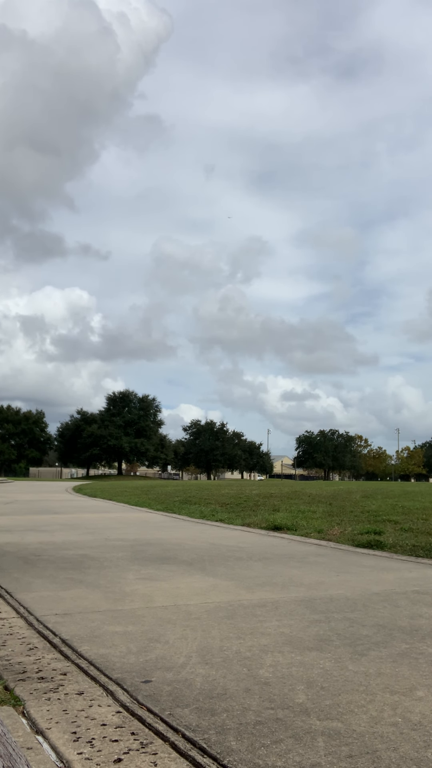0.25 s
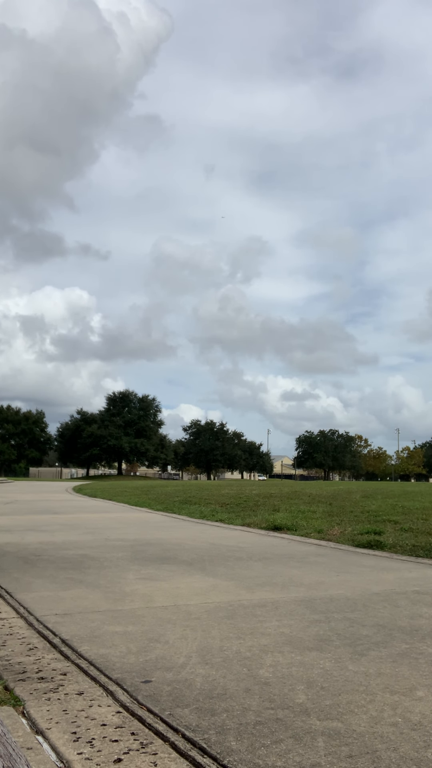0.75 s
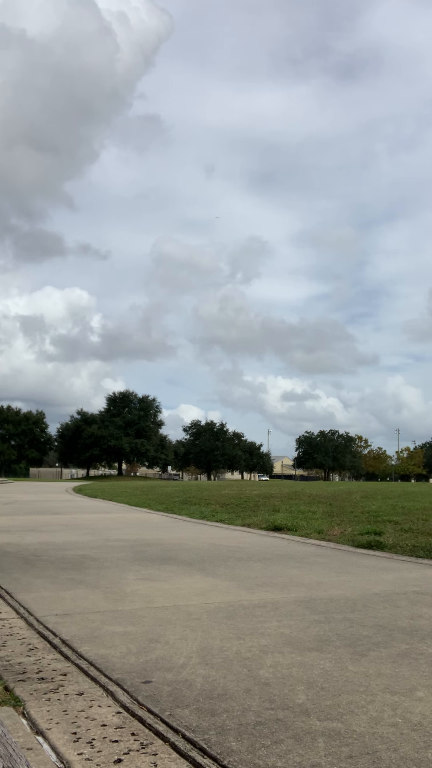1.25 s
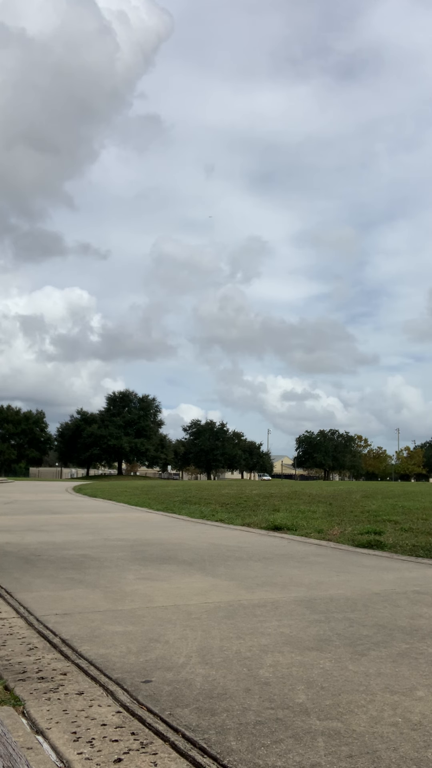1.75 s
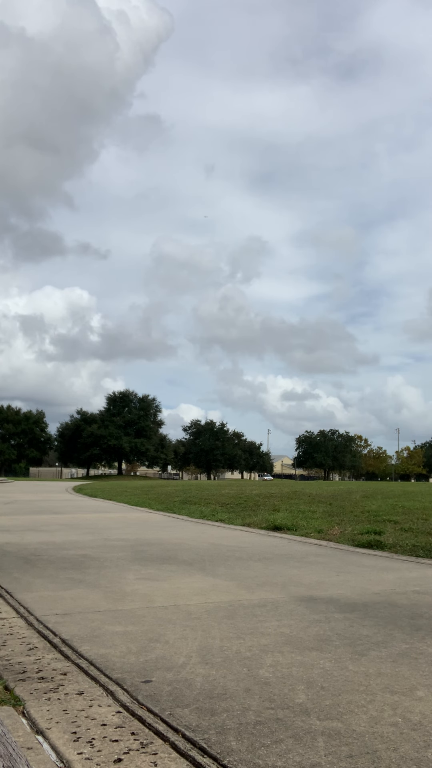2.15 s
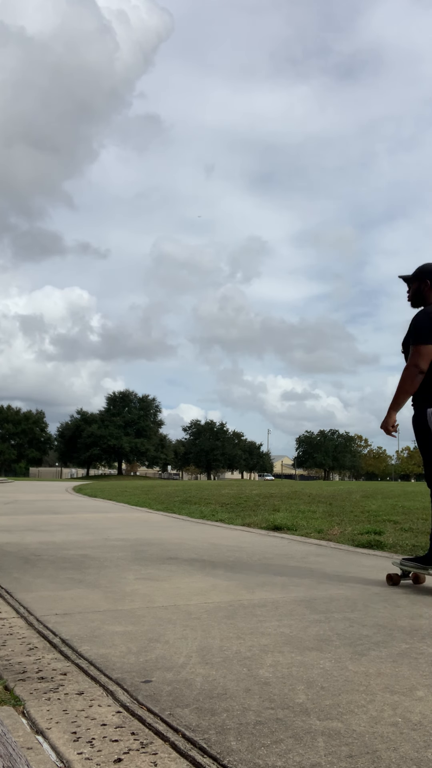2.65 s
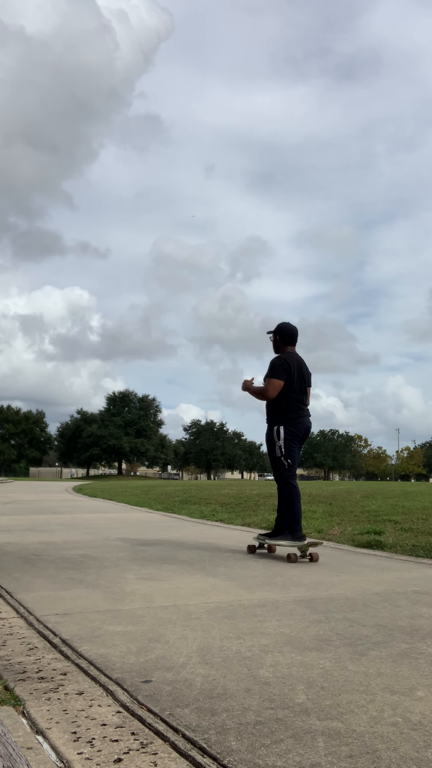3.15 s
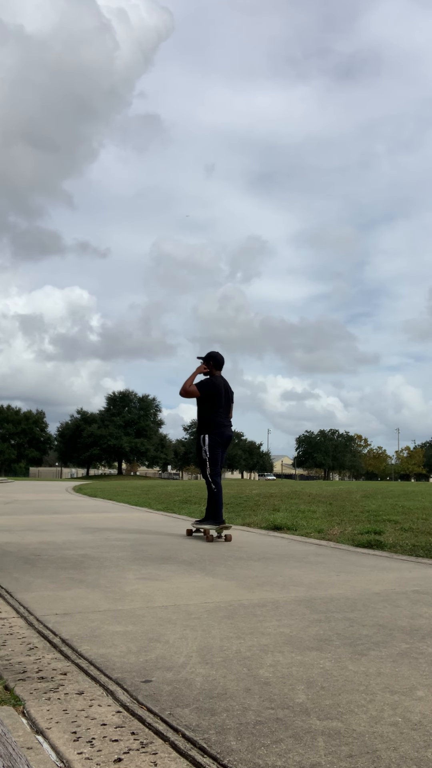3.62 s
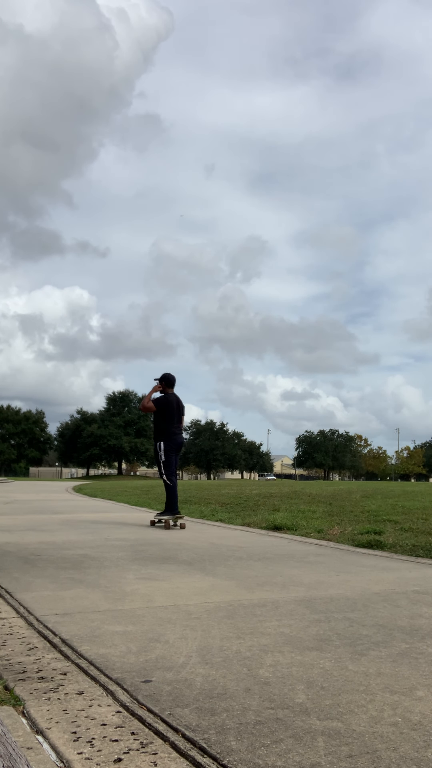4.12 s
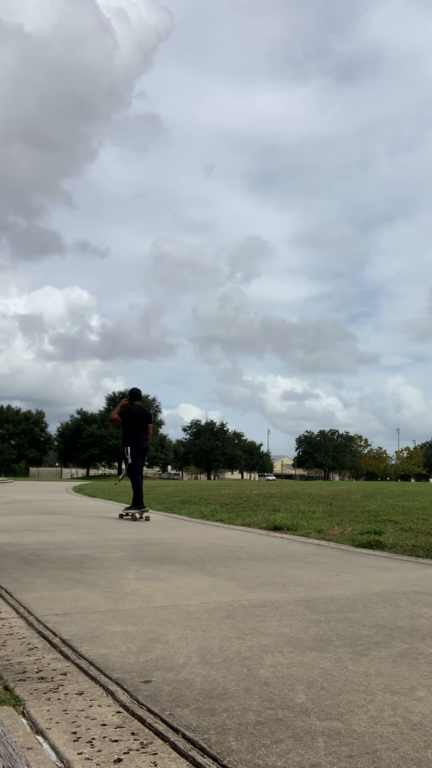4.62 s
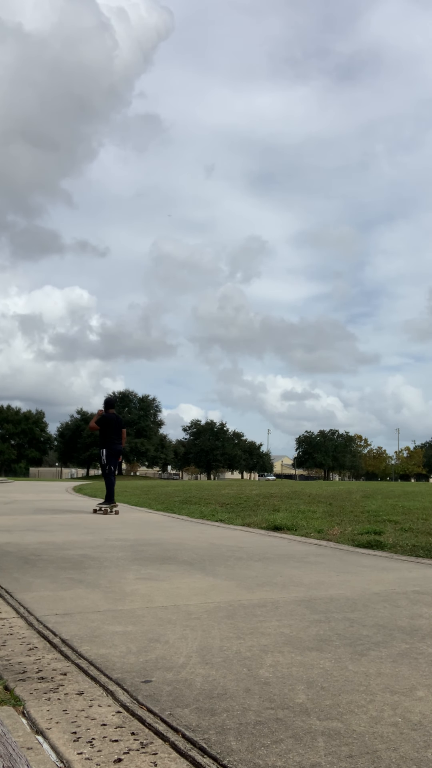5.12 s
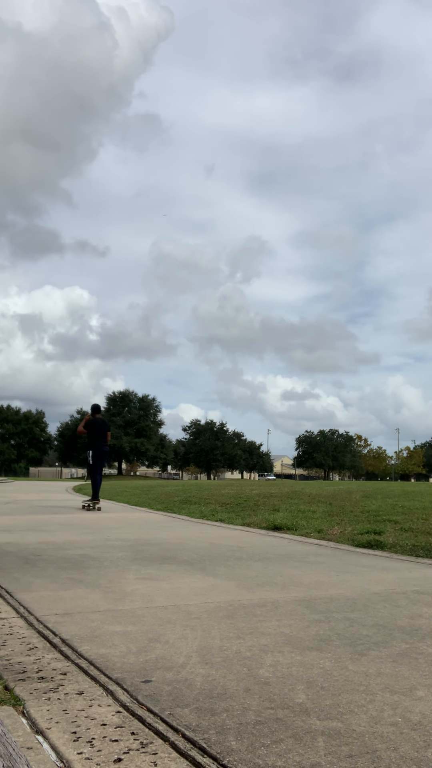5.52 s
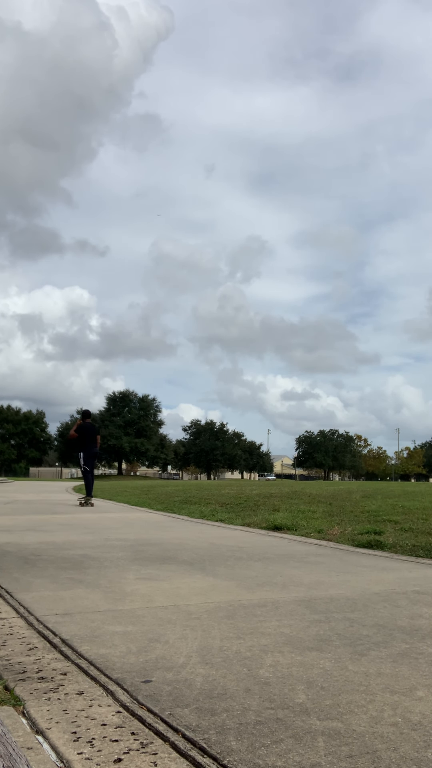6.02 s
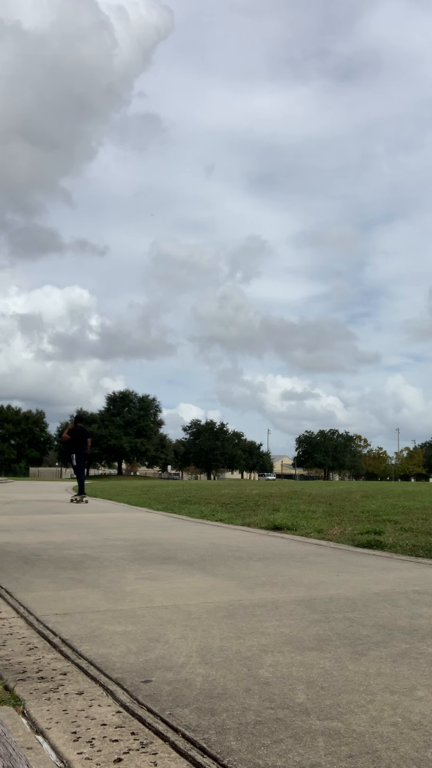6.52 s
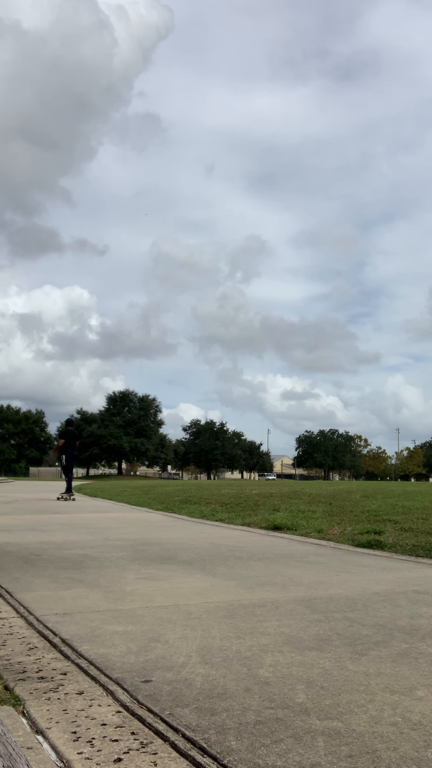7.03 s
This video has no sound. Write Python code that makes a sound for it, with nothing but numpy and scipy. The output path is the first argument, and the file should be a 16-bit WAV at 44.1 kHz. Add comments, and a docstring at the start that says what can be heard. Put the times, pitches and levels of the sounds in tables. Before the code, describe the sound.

Gritty skateboard wheels approach, pass close by and fade along a park path, with wooden seam clacks, loose metal buzz and low wind buffeting.

```python
"""Skateboard passing on concrete

A skateboard coasts past a stereo microphone about three metres off a park path, then rolls away, slowing.
Concrete that differs from slab to slab drives shaped noises: deck roar, wheel rasp and grit, pulsed by
the wheel turns. Seams and sand ring decaying wood and metal modes; a loose truck buzzes in step.
Noise bursts make shoe scuffs; low noise and slaps are wind on the microphone, over a faint steady hiss."""
import sys
import numpy as np
from scipy import signal
from scipy.fft import rfft, irfft
from scipy.io import wavfile
from scipy.ndimage import uniform_filter1d

SR = 44100
rng = np.random.default_rng(int(sys.argv[2]) if len(sys.argv) > 2 else 0)


def master_out(mix):
    """Clip the mix to full scale and print it as 16-bit PCM to the path in sys.argv[1]."""
    frames = np.transpose(np.atleast_2d(mix))
    ceiling = np.clip(frames, -1, 1)
    pcm = np.round(ceiling * 32767).astype(np.int16)
    wavfile.write(sys.argv[1], SR, pcm)


N = 320944  # length in samples

# Speed of the wheels. Each row: time in seconds, turns per second.
WHEEL_SPIN = [(0.0, 15.13), (0.5, 17.19), (1.5, 17.95), (3.0, 16.43), (3.5, 15.54), (7.28, 11.05)]
# Deck roar, wheel rasp, grit. Each row: level at the nearest point in dB before the slab's own finish,
# loss per doubling of distance in dB.
ROLL_LEVELS = [(-44, 4), (-49, 4.5), (-53.5, 5)]
# Finish of each stretch of concrete. Each row: mid-crossing in seconds, deck roar, wheel rasp, grit in dB.
SLAB_FINISH = [(0.07, -7.5, 7.5, 3), (.48, -2, 4, -2), (.77, 7, 10.5, 3.5), (.9, 6, 3.5, -1.5),
               (1.2, 9.5, 7, -2), (1.72, 6, -1, 1), (2.35, 3, 2.5, 1), (2.95, -0.5, -1, -1),
               (3.9, 1.5, 5, -1.5), (4.56, -3.5, 1.5, -5), (4.82, -2.5, 1, 3), (5.25, -6, -3, -2.5)]
# Small coarse patches under a wheel. Each row: middle in seconds, extra rasp in dB, half length in seconds.
COARSE_PATCHES = [(.15, 5.5, .035), (0.247, 2.5, .04), (0.81, 2.5, 0.054), (1.252, 5.5, .028),
                  (1.41, 4.5, .025), (1.56, 3, .06), (2.56, 3, .03), (3.96, 2.5, 0.022)]
# Colour of the rolling in five views of the board, far to leaving.
# Each row: frequency in Hz, relative density in dB per Hz.
FAR_COLOUR = [(170, -4.5), (346, -6), (740, -19), (1167, -9.5), (1430, -13.5), (1938, -4.5), (2908, -12.5),
              (3747, -16), (3942, -17), (5344, -25.5), (6546, -34.5), (7245, -44.5), (10869, -46),
              (15500, -68)]
ONCOMING_COLOUR = [(170, 1), (300, -4.5), (470, -17.5), (590, -9), (850, -24.5), (1080, -20), (1500, -22.5),
                   (1900, -27), (2600, -29), (3400, -30.5), (5000, -34), (7000, -36), (9000, -34.5),
                   (12500, -39), (15500, -29)]
ABREAST_COLOUR = [(170, 1.5), (210, -2.5), (300, -14), (490, -16.5), (615, -5), (790, -13), (930, -22.5),
                  (1100, -27.5), (1280, -27), (1430, -18.5), (2200, -24.5), (2600, -15), (3200, -28),
                  (4100, -23.5), (4600, -18.5), (6500, -28), (9000, -28.5), (12500, -37), (15500, -41)]
PAST_COLOUR = [(170, 7.5), (250, -34), (340, -12), (450, -9.5), (600, -7.5), (780, -14.5), (1020, -16.5),
               (1250, -27), (2200, -23.5), (3100, -32.5), (4600, -29.5), (7000, -43), (10000, -40),
               (12500, -43), (15500, -50)]
LEAVING_COLOUR = [(170, 1), (320, -10.5), (460, 4.5), (620, 0.5), (730, -20.5), (880, -23.5), (1020, -9.5),
                  (1800, -22.5), (2030, -11), (2550, -11.5), (3100, -31), (4700, -24), (7000, -36),
                  (11000, -39.5), (15500, -46)]
# When each of the five views holds, in that order. Each entry: time in seconds.
VIEW_TIMES = [.7, 1.4, 2.45, 3.4, 4.15]
# The two microphone ports. Each row: frequency in Hz, phase between the ports in radians with the board
# oncoming, abreast, ahead, then likeness of the ports from 0 to 1.
MIC_PORTS = [(100, 0, 0, 0, 1), (300, 0, -.8, 0, .92), (450, -.6, -.1, -.3, .87), (560, -1.7, 1, -.4, .92),
             (700, -2.4, 3.3, -.7, .85), (880, -3, 4.2, -.3, .88), (1100, -.8, 4.4, -.2, .8),
             (1400, -1.6, 4.3, 0, .8), (1900, -1.7, 4.2, -.4, .75), (2500, -2.6, 3.3, -4.5, .75),
             (3000, -2.8, 2, -4.8, .65), (3500, -2.4, -1, -5.7, .75), (4000, -2.4, -1.3, -6.4, .75),
             (4600, -2.9, -2.5, -3.9, .8), (5700, -4, -3.7, -4.3, .7), (6300, -5.9, -6.2, -6, .65),
             (7200, -6.8, -6.8, -6.8, .85), (11800, -8.7, -8.7, -8.7, .8),
             (12900, -9.42, -9.42, -9.42, .98)]
# Where the sound comes from. Each row: time in seconds, share oncoming, abreast, ahead from 0 to 1.
BEARING_SHARES = [(1.74, 1, 0, 0), (1.9, 0, 1, 0), (3.1, 0, 1, 0), (3.95, 0, 0, 1)]
# Steady, diffuse background hiss, from the recorder and the surroundings.
# Each row: frequency in Hz, relative density in dB per Hz.
BACKGROUND_COLOUR = [(383, -4.5), (574, -11), (800, -7.5), (1055, -6.5), (1843, -5.5), (2908, -16.5),
                     (4363, -21.5), (4829, -22), (9821, -30.5), (15500, -32)]
# Strength of the breeze at the microphone. Each row: time in seconds, level in dB before its lumps.
BREEZE = [(0, -38), (.2, -27.5), (.7, -39), (1.1, -32), (1.45, -25), (1.62, -36), (2.0, -33), (2.5, -34),
          (2.8, -35), (3.05, -37), (3.4, -36), (4.0, -35), (4.3, -38), (4.75, -34.5), (5.15, -33.5),
          (5.5, -31.5), (6.25, -32), (6.7, -40), (7.28, -37.5)]
# Short gusts on top of the breeze. Each row: peak in seconds, level in dB, half length in seconds.
SHORT_GUSTS = [(.49, -27.5, 0.018), (3.3, -27, 0.045), (3.67, -27.5, 0.031), (3.79, -29.5, 0.027),
               (4.125, -22.5, 0.0099), (4.62, -30, 0.047), (4.77, -27.5, 0.08), (5.49, -34, 0.052),
               (5.72, -28.5, 0.043), (6.6, -30, 0.031), (6.83, -29, 0.023)]
# Colour of the wind rumble. Each row: frequency in Hz, relative density in dB per Hz.
RUMBLE_COLOUR = [(12, -62), (20, 7.5), (48, 3.5), (69, 12), (113, -4.5), (199, -19), (330, -30), (430, -36),
                 (730, -120)]
# Eddies slapping the microphone. Each row: start in seconds, relative level in dB, fall time in seconds.
EDDY_SLAPS = [(.066, -39.5, 0.015), (.146, -28.5, 0.012), (3.77, -31.5, 0.0034), (4.561, -44, 0.013),
              (4.62, -37, 0.033), (5.70, -46, 0.013), (5.758, -53, 0.0073), (5.906, -40, 0.013),
              (6.466, -37.5, 0.0088), (6.572, -49, 0.012), (6.81, -45, .015)]
# Colour of those slaps. Each row: frequency in Hz, relative density in dB per Hz.
SLAP_COLOUR = [(30, -5), (120, 11), (300, 5), (600, -17), (1200, -26), (4000, -28), (16000, -103)]
# Gusts that swing the diaphragm. Each row: start in seconds, relative level in dB, frequency in Hz,
# fall time in seconds.
WIND_THUMPS = [(0.163, -6.5, 69, 0.016), (1.936, -20, 58.5, .05), (4.517, -17, 42.2, .03),
               (4.565, -16, 52.4, 0.061), (6.806, -28, 60, .025)]
# A shoe brushing the ground. Each row: start in seconds, relative level in dB, fall time in seconds.
SHOE_SCUFFS = [(.535, -45.5, 0.06), (.573, -38.5, 0.0071), (.745, -44, 0.022)]
# Colour of the sole. Each row: frequency in Hz, relative density in dB per Hz.
SOLE_COLOUR = [(200, -42), (600, 14.5), (1200, 11.5), (2200, 2), (5000, -14), (16000, -38)]
# Large sand grains crushed by a wheel. Each row: start in seconds, relative level in dB.
SAND_GRAINS = [(0.8352, -41), (1.574, -54), (1.629, -53), (2.392, -31), (2.574, -31), (3.961, -32),
               (4.125, -40), (4.368, -38.5), (4.81, -38), (5.035, -36)]
# Wheels striking the edge of a seam or crack, clustered as each axle crosses. Each row: start in seconds,
# knock in relative dB, pitch factor, hardness in dB per octave, low thud in dB, ring time factor,
# crack in relative dB, truck ring in relative dB.
SEAM_HITS = [(1.7202, -20.8, .88, 4.2, -1, 1, -32, -39), (1.7236, -22.5, .9, 4.3, 7, 1, -33, -34),
             (1.7306, -20.5, .85, 2.2, 6, .8, -36, -45), (1.893, -26.6, .99, 3.5, -1, 1.3, -40, -53),
             (1.9004, -21.8, .91, 4.5, 0, .95, -34, -46), (1.906, -16.4, .89, 1.7, -4, 1, -35, -44),
             (1.9168, -33.5, .94, 2.2, 0, .8, -40, -58), (2.7143, -33.5, .96, 1, 3, 1, -42, -43),
             (2.7171, -33.7, .91, 2.5, 4, .8, -44, -43), (2.8909, -30.5, .92, 4.5, 3, .9, -42, -57),
             (2.8961, -31.5, .93, 4.5, 2, 1.2, -44, -54), (4.561, -30, .92, 3, 0, .8, -55, -62),
             (4.937, -26.6, .99, 4.5, -10, 1.1, -39, -38), (4.9393, -27.4, .97, .5, -10, 1.06, -40, -33),
             (4.9484, -31.5, .99, 2.3, -9, 1.3, -47, -44), (5.1576, -21, 1.02, 0.3, -5, 1.75, -35, -30),
             (5.1657, -23.6, 1.02, 2.6, 4, .64, -38, -35), (5.1739, -34, .93, .3, 2, 1, -49, -48)]
# Wooden deck modes. Each row: frequency in Hz before the pitch factor, relative level in dB,
# t60 in seconds before the ring time factor.
DECK_MODES = [(244, 2.5, 0.073), (363, -3.5, 0.076), (517, 10.7, 0.025), (656, 0.8, 0.042),
              (754, -4.0, 0.04), (907, -6.8, 0.042), (1077, -11.4, 0.034), (1322, -11.3, 0.03),
              (1547, -13.1, 0.043), (2088, -18.3, 0.04)]
# Modes of a struck truck. Each row: frequency in Hz, relative level in dB, t60 in seconds.
METAL_MODES = [(1592, 1.5, .04), (2547, -2.5, .025), (2941, -3, .022), (3673, 0, .027), (4100, -5, .018)]
# Colour of the gritty crack. Each row: frequency in Hz, relative density in dB per Hz.
CRACK_COLOUR = [(150, -14), (350, 4), (750, 5), (1100, 0), (1650, 1), (2100, -8), (3700, -8), (4800, -14),
                (6400, -5), (8000, -6), (11000, -8), (16000, -12)]
# Truck resonances under buzz and rattle. Each row: frequency in Hz, width in Hz, relative level in dB.
TRUCK_RESONANCES = [(1620, 240, 1), (2550, 550, 0), (3680, 600, 0)]
# Bouts of buzzing from a loose truck. Each row: peak in seconds, level in dB, half length in seconds.
BUZZ_BOUTS = [(4.28, -61, .2), (4.76, -57, .14), (4.915, -51.5, .045), (5.05, -51, .04)]

WHEEL_M = .22  # metres rolled in one turn of a wheel
PASS_S, CLOSEST_M = 2.645, 2.92  # when the board is nearest (s), and how near (m)
CROSSING_S = 0.12  # time the board takes to settle on a new finish
TAPS_PER_TURN = 5  # taps of the loose part in one turn of a wheel, on average
BACKGROUND_DB = -53.5
EDGE_HZ = 15900  # upper band limit
FFT_SIZE, HOP = 1024, 256  # samples

TIME = np.arange(N) / SR
HZ = np.fft.rfftfreq(FFT_SIZE, 1 / SR)
FRAMES = np.arange(-(-N // HOP) + 1) * HOP / SR  # spectrum frame times (s)


def amp(db):
    """Decibels to gain."""
    return 10 ** (np.asarray(db) / 20)


def unit(x):
    """Scales to rms 1."""
    return x / np.sqrt(np.mean(x ** 2) + 1e-20)


def colour(points):
    """A short spectrum as dB on every frequency bin, straight between points on a log axis."""
    hz, db = np.transpose(points)
    return np.interp(np.log(HZ + 1), np.log(hz + 1), db)


def curve(rows, t, axis=1):
    """One column of a table of curves at the times (or frequencies) t."""
    rows = np.array(rows)
    return np.interp(t, rows[:, 0], rows[:, axis])


def below(hz, order=6):
    """Gain of a low-pass, steep by default."""
    return 1 / np.sqrt(1 + (HZ / hz) ** (2 * order))


def above(hz):
    return np.sqrt(1 - below(hz) ** 2)


def wander(per_s):
    """Smooth chance of rms 1 that changes up to about per_s times a second."""
    hz = np.fft.rfftfreq(N, 1 / SR)
    spectrum = rfft(rng.standard_normal(N))
    return unit(irfft(spectrum / (1 + (hz / per_s) ** 4), N))


def burst(s, rise, fall):
    """An envelope that starts at s, swells and dies away."""
    t = np.maximum(TIME - s, 0)
    return (1 - np.exp(-t / rise)) * np.exp(-np.minimum(t / fall, 60))


def bell(s, half):
    """A bell-shaped rise and fall with its peak of 1 at s."""
    return np.exp(-np.minimum(((TIME - s) / half) ** 2, 60))


def swells(rows):
    """Bell-shaped rises and falls of gain, summed."""
    return sum(amp(db) * bell(s, half) for s, db, half in rows)


def white():
    """Two unrelated noises."""
    return rng.standard_normal((2, N))


def heard(pair, gain, diffuse=False):
    """Colours two unrelated signals and folds them into the two ports; diffuse sound averages the bearings."""
    a, b = signal.stft(pair, nperseg=FFT_SIZE, noverlap=FFT_SIZE - HOP)[2].transpose(0, 2, 1)
    turns = np.array([np.exp(1j * curve(MIC_PORTS, HZ, axis=k)) for k in (1, 2, 3)])
    shares = np.transpose([curve(BEARING_SHARES, FRAMES, axis=k) for k in (1, 2, 3)])
    direction = turns.mean(0) if diffuse else shares @ turns
    same = curve(MIC_PORTS, HZ, axis=4) * direction
    unlike = np.sqrt(np.maximum(1 - abs(same) ** 2, 0))
    ports = np.array([a, same.conj() * a + unlike * b]) * gain
    return signal.istft(ports.transpose(0, 2, 1), nperseg=FFT_SIZE, noverlap=FFT_SIZE - HOP)[1][:, :N]


def distance():
    """Metres to the board, which follows a straight line as far as its wheels have turned."""
    along = WHEEL_M * np.cumsum(curve(WHEEL_SPIN, TIME)) / SR
    return np.hypot(CLOSEST_M, along - np.interp(PASS_S, TIME, along))


def roll_gains():
    """Roar, rasp and grit fade with distance and follow the finish of the concrete under the wheels."""
    doublings = np.log2(distance() / CLOSEST_M)
    slabs = np.array(SLAB_FINISH)
    reached = np.clip((TIME - slabs[:, :1]) / CROSSING_S + .5, 0, 1)
    steps_db = np.diff(slabs[:, 1:], axis=0, prepend=0)
    finish_db = steps_db.T @ reached
    finish_db[1] += sum(db * bell(s, half) for s, db, half in COARSE_PATCHES)
    return [amp(db - loss_db * doublings + finish)
            for (db, loss_db), finish in zip(ROLL_LEVELS, finish_db)]


def tread(depth_db, second_db, uneven_db):
    """A rough patch on each of two wheels meets the ground once a turn; the wheels drift out of step."""
    turns = np.cumsum(curve(WHEEL_SPIN, TIME)) / SR + .03
    other_turns = turns + (TIME - 2.9) / 2.4
    patch = np.exp(1.6 * (np.cos(2 * np.pi * turns) - 1))
    other = np.exp(7 * (np.cos(2 * np.pi * other_turns) - 1))  # a shorter patch
    load = .5 + .09 * wander(6.6)
    return unit(amp((depth_db * patch + second_db * other) * load + uneven_db * wander(58)))


def stones(per_s, spread_db, share):
    """Tiny blows from the grains of the concrete: separate clicks over a dense hiss."""
    size = amp(spread_db * np.minimum(rng.exponential(1, N), 4))
    clicks = size * (rng.random(N) < per_s / SR)
    share = np.clip(share, 0, 1)  # power share of the clicks
    return np.sqrt(share) * unit(clicks * white()) + np.sqrt(1 - share) * white()


def ripple(depth_db):
    """Random narrow ripple in the rolling colour, drifting slowly and shallower in the treble."""
    field = rng.standard_normal((len(FRAMES), len(HZ)))
    slow = uniform_filter1d(field, size=30, axis=0)
    drift = unit(uniform_filter1d(slow, size=2, axis=1))
    return amp(depth_db * drift * below(7000, order=1))


def rolling():
    """Deck roar, wheel rasp and grit share one colour, which changes as the board goes by."""
    colours = FAR_COLOUR, ONCOMING_COLOUR, ABREAST_COLOUR, PAST_COLOUR, LEAVING_COLOUR
    views = [colour(view) for view in colours]
    weights = np.transpose([np.interp(FRAMES, VIEW_TIMES, row) for row in np.eye(len(views))])
    tone = amp(weights @ views) * above(158) * ripple(depth_db=4.0)
    bands = above(273) * below(1170), above(696) * below(5800), above(6010) * below(EDGE_HZ)
    # each layer's colour is levelled within its own band, frame by frame
    roar, rasp, grit = (tone / np.sqrt(np.mean((tone * band) ** 2, 1, keepdims=True)) for band in bands)
    roar_gain, rasp_gain, grit_gain = roll_gains()
    coarse = stones(per_s=1200, spread_db=2.8, share=.7)
    fine = stones(per_s=3000, spread_db=2.7, share=.65)
    roar_tread = tread(depth_db=-1.5, second_db=0.0, uneven_db=0.7)
    rasp_tread = tread(depth_db=4.5, second_db=1.0, uneven_db=2.0)
    grit_tread = tread(depth_db=11, second_db=0, uneven_db=1.1)
    out = heard(white() * roar_gain * roar_tread, roar * below(1135))
    out += heard(coarse * rasp_gain * rasp_tread, rasp * bands[1])
    out += heard(fine * grit_gain * grit_tread, grit * bands[2])
    return out


def background():
    """Steady, diffuse background hiss, from the recorder and the surroundings, that barely swells."""
    tone = unit(amp(colour(BACKGROUND_COLOUR)) * below(EDGE_HZ))
    return amp(BACKGROUND_DB + .5 * wander(4.5)) * heard(white(), tone, diffuse=True)


def wind(steady=0.93, flutter_db=2.5, upper_db=5.5, lumps_db=2.5, lumps_per_s=9):
    """Turbulence at the microphone: a lumpy rumble swelling in gusts; its upper part comes in flurries."""
    tone = unit(amp(colour(RUMBLE_COLOUR)) * below(520, order=4))
    deep = heard(white(), tone * below(178))
    swell = np.sqrt(uniform_filter1d(deep[0] ** 2, size=3000) + 1e-9)
    deep = unit(deep / swell ** np.clip(steady, 0, 1))  # the gust, not chance, sets the slow swell
    upper = heard(white(), tone * above(142.0)) * unit(amp(flutter_db * wander(61)))
    breeze = amp(curve(BREEZE, TIME) + lumps_db * wander(lumps_per_s))
    return np.hypot(breeze, swells(SHORT_GUSTS)) * (deep + amp(upper_db) * upper)


def puffs(rows, spectrum):
    """Short bursts of noise of one colour: air slapping the microphone, or a sole rubbing the ground."""
    envelope = sum(amp(db) * burst(s, rise=fall / 10, fall=fall) for s, db, fall in rows)
    return 2 * envelope * heard(white(), unit(amp(colour(spectrum))))


def eddies():
    """Eddies slap the microphone in short puffs."""
    return puffs(EDDY_SLAPS, SLAP_COLOUR)


def thumps():
    """Deep pressure blows of the wind: the pushed diaphragm swings as a decaying sine."""
    return sum(amp(db) * burst(s, rise=0.0067, fall=fall) * np.sin(2 * np.pi * hz * (TIME - s))
               for s, db, hz, fall in WIND_THUMPS)


def scuffs():
    """A shoe brushes the ground: short rubs of noise."""
    return puffs(SHOE_SCUFFS, SOLE_COLOUR)


def ring(s, modes, rise=0.0007):
    """One blow sets modes ringing; neighbours swing in opposite directions."""
    out, start = np.zeros(N), round(s * SR)
    t = np.arange(SR // 5) / SR
    tones = sum((-1) ** k * amp(db - 60 * t / t60) * np.sin(2 * np.pi * hz * t)
                for k, (hz, db, t60) in enumerate(modes))
    out[start:start + len(t)] = tones * (1 - np.exp(-t / rise))
    return out


def knock(s, pitch, hardness_db=0, thud_db=0, ring_time=1):
    """Hard blows brighten the deck, heavy ones bend its low modes; the rider's weight sets the ring time."""
    modes = []
    for hz, db, t60 in DECK_MODES:
        tilt_db = hardness_db * np.log2(hz / 500) + thud_db * (hz < 400)
        modes.append((hz * pitch, db + tilt_db, t60 * ring_time))
    return ring(s, modes)


def truck():
    """Gain of the truck's metal resonances."""
    return unit(sum(amp(db) / (1 + (2 * (HZ - hz) / width) ** 2) for hz, width, db in TRUCK_RESONANCES))


def clacks(contact_db=2.5, rattle_db=-2):
    """Seam edges give a wooden knock, gritty crack, truck ring and rattle; sand ticks and knocks faintly."""
    body, crack, rattle = np.zeros((3, N))
    for s, db, pitch, hardness_db, thud_db, ring_time, crack_db, truck_db in SEAM_HITS:
        body += amp(db) * knock(s, pitch, hardness_db, thud_db, ring_time)
        body += amp(truck_db) * ring(s, METAL_MODES)
        crack += amp(crack_db + contact_db) * burst(s - .001, rise=.0005, fall=.0048)
        rattle += amp(truck_db + rattle_db) * burst(s, rise=.0008, fall=.0055)
    for s, db in SAND_GRAINS:
        body += amp(db - 15.0) * knock(s, rng.uniform(0.75, 1.31))
        crack += amp(db - 4.5) * burst(s, rise=0.0012, fall=0.0051)
    out = heard(np.array([body, np.zeros(N)]), above(140))
    out += heard(white() * crack, unit(amp(colour(CRACK_COLOUR))))
    out += heard(white() * rattle, unit(truck() * below(5300)))
    return out


def open_air(x, wet_db=-23, t60=0.082):
    """Ground and trees scatter back a weak, dull tail."""
    t = np.arange(SR // 2) / SR
    dull = signal.lfilter([1], [1, -.7], rng.standard_normal((2, len(t))))
    tail = dull * amp(-60 * t / t60) * (t > .008)  # first return after 8 ms
    return x + amp(wet_db) * signal.fftconvolve(x, tail / np.linalg.norm(tail[0]), axes=1)[:, :N]


def buzz(jitter=0.08, scrape=0.4, rebound_db=-53, contact_s=.0013):
    """A loose truck part taps and scrapes in step with the wheels; shaken hard, it rebounds into a burr."""
    tap_rate = TAPS_PER_TURN * curve(WHEEL_SPIN, TIME) * (1 + jitter * wander(60))
    cycles = np.cumsum(tap_rate) / SR
    # rebounds fall half a cycle from the taps
    taps, rebounds = (np.diff(np.floor(cycles + late), prepend=0) * amp(2 * wander(80))
                      for late in (0, .5))
    level = swells(BUZZ_BOUTS)
    blows = taps + rebounds * np.minimum(level / amp(rebound_db), 1)
    contact = unit(signal.lfilter([1], [1, -np.exp(-1 / (contact_s * SR))], blows))
    return heard(white() * unit(contact + scrape) * level, unit(truck() * above(1640) * below(4100)))


def scene():
    """The board, the rider's shoe and the background in stereo; the wind is the same in both channels."""
    board = rolling() + scuffs() + open_air(clacks()) + buzz()
    air = (wind() + eddies())[0] + thumps()
    return board + background() + air


def record(dry):
    """The microphone's low cut and the recorder's band limit."""
    hz = np.fft.rfftfreq(N, 1 / SR)
    cut = irfft(rfft(dry) / np.sqrt(1 + (38 / (hz + 1)) ** 8), N)
    band_limit = signal.firwin(511, EDGE_HZ, window=("kaiser", 9), fs=SR)
    return signal.oaconvolve(cut, band_limit[None], "same")


dry = scene()
out = record(dry)
master_out(out)
```